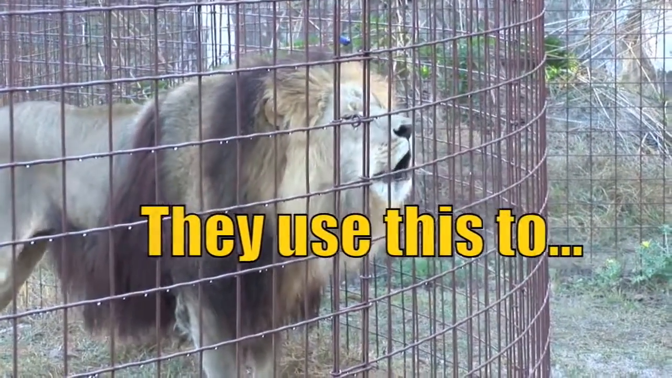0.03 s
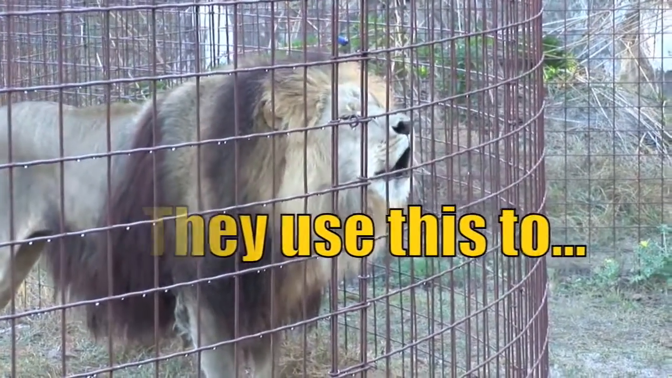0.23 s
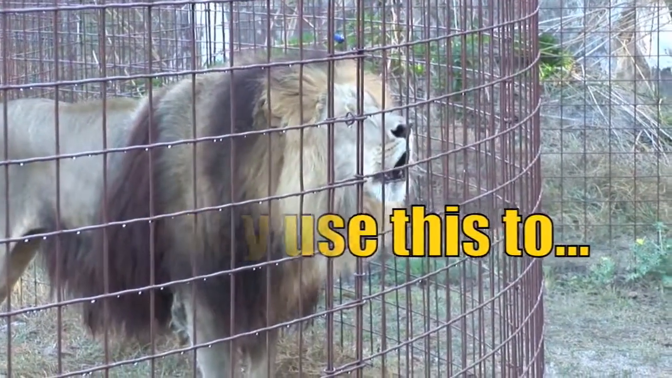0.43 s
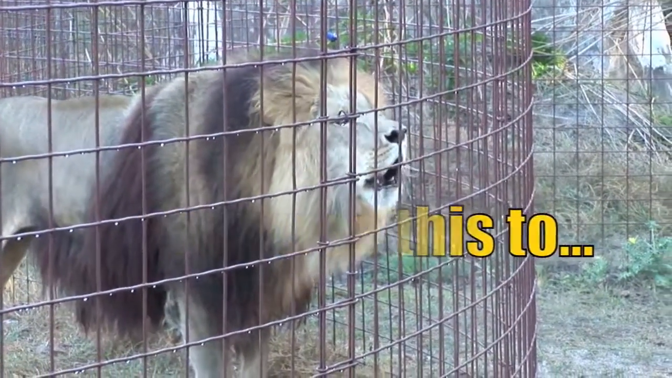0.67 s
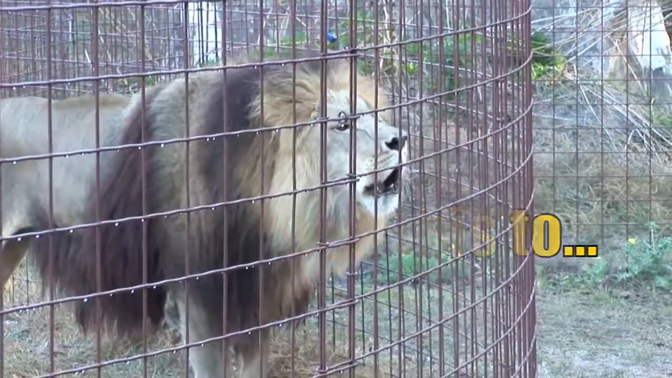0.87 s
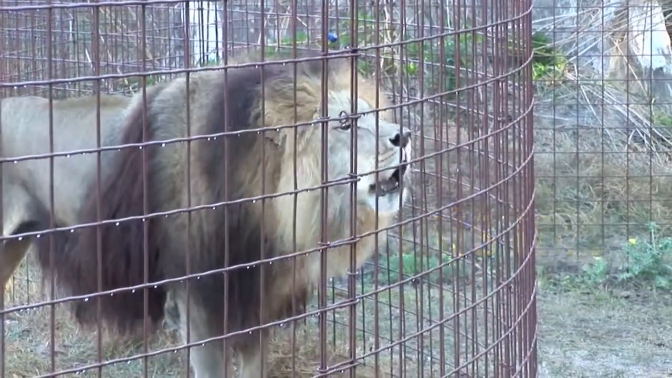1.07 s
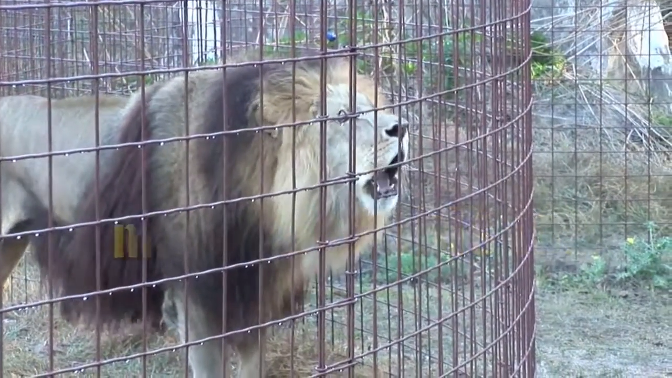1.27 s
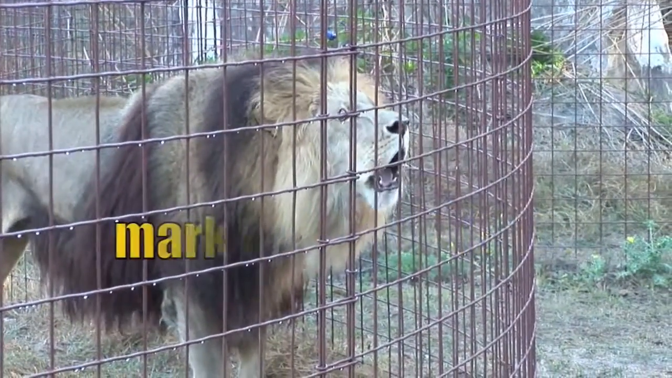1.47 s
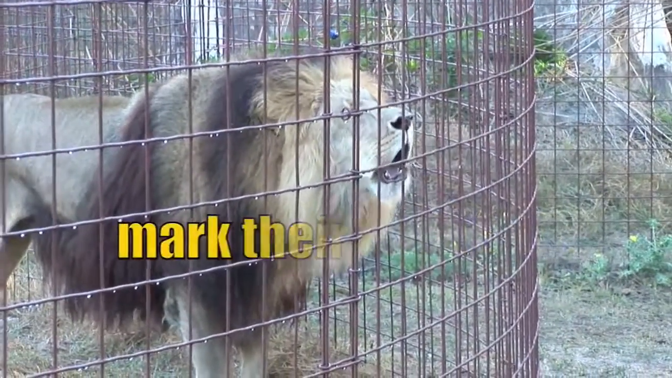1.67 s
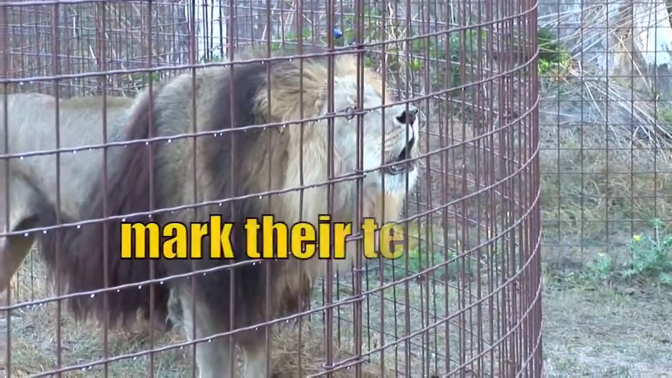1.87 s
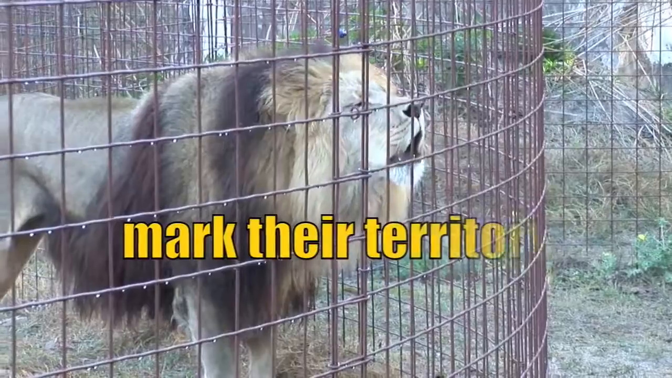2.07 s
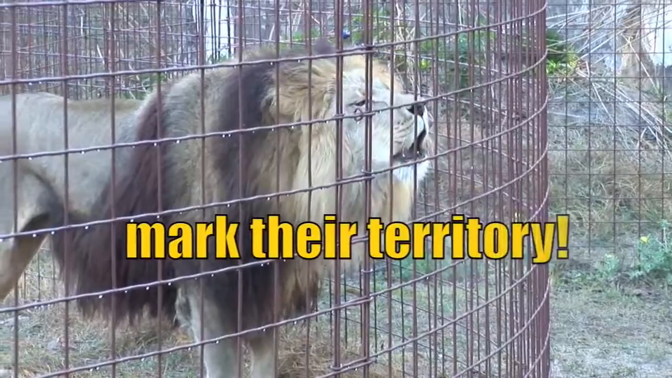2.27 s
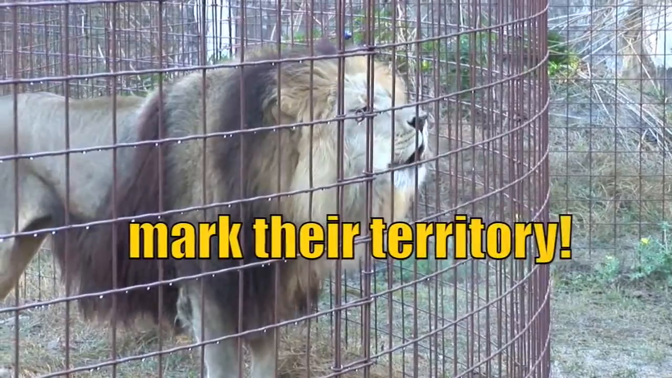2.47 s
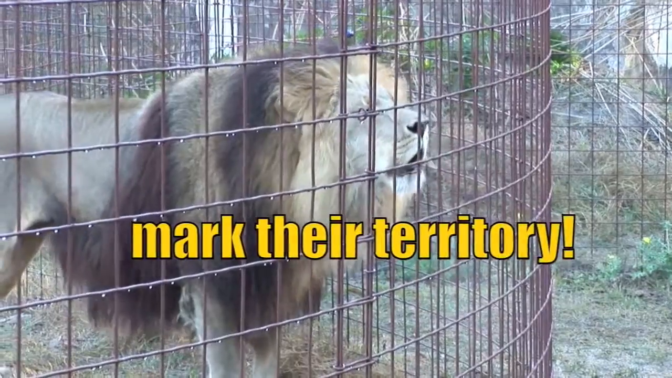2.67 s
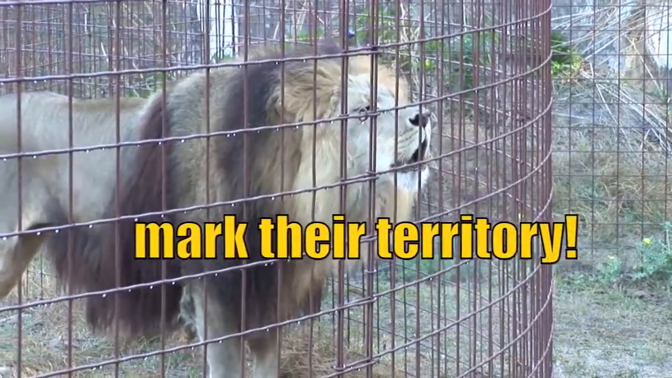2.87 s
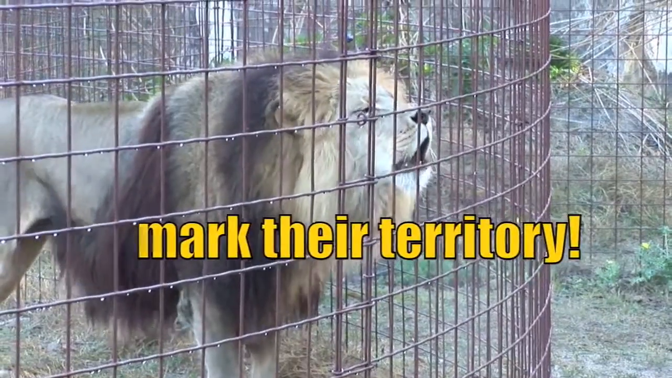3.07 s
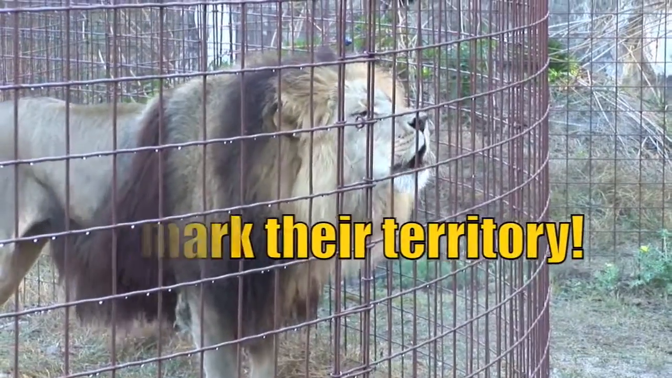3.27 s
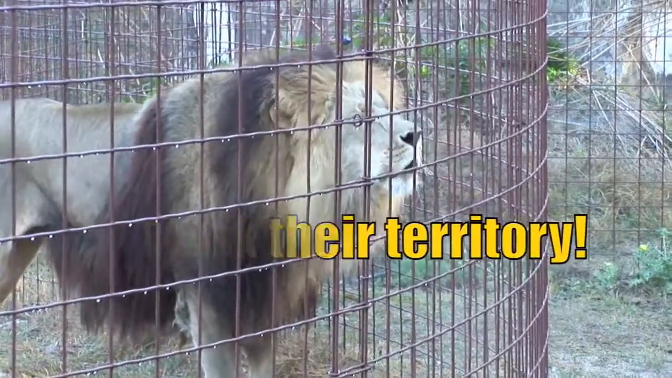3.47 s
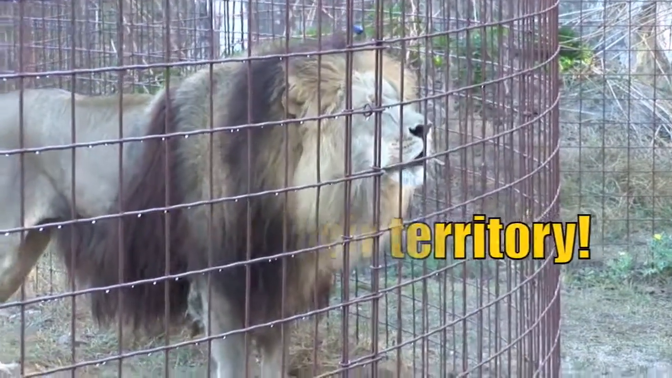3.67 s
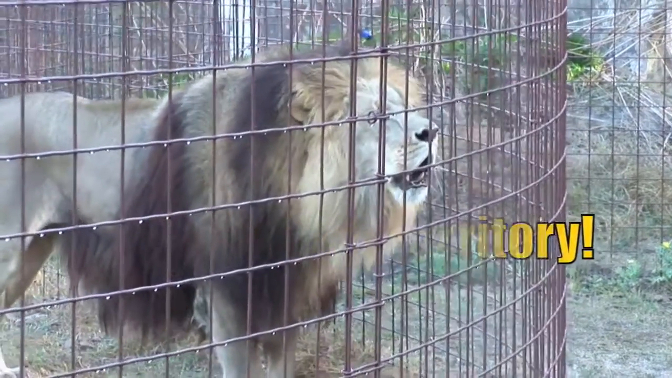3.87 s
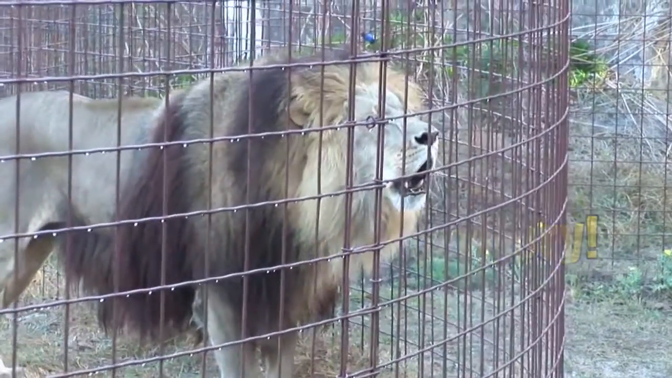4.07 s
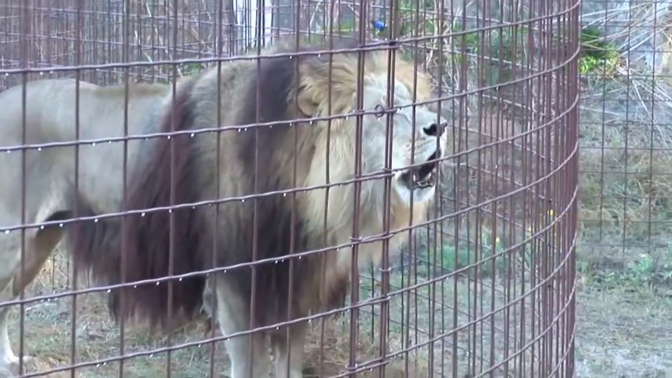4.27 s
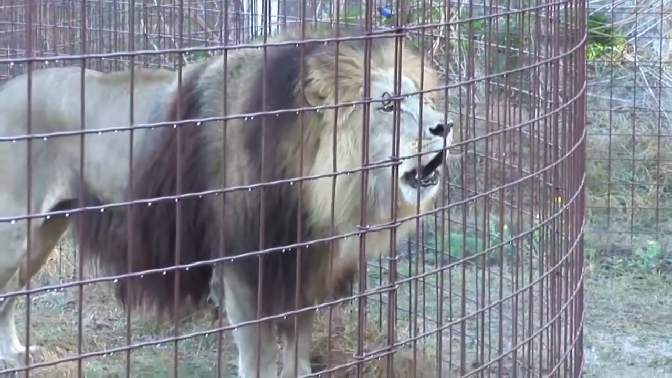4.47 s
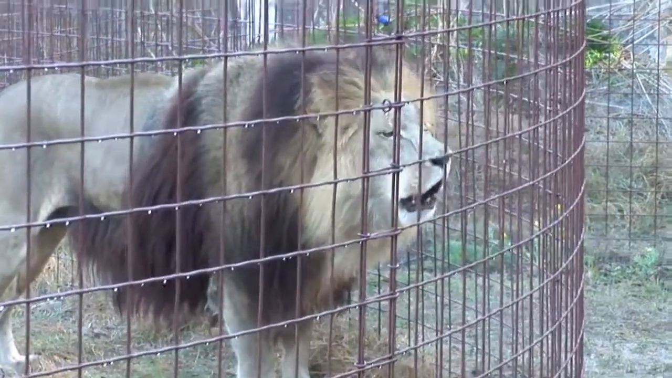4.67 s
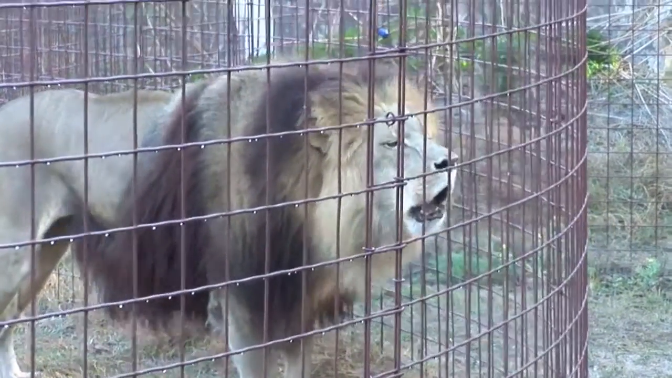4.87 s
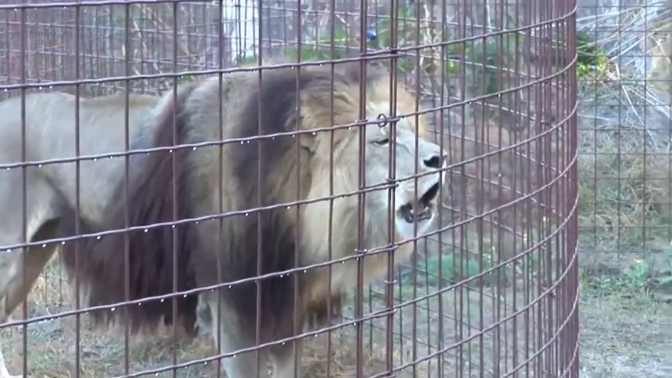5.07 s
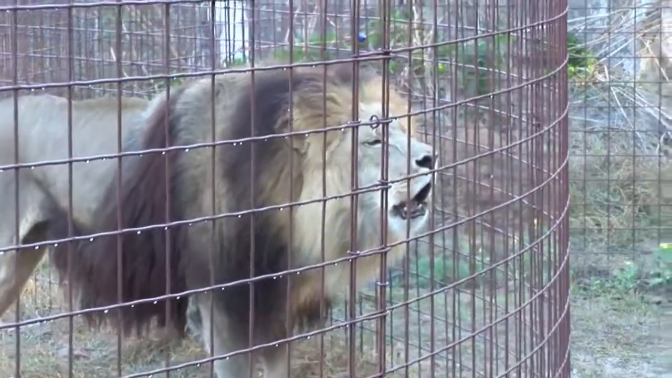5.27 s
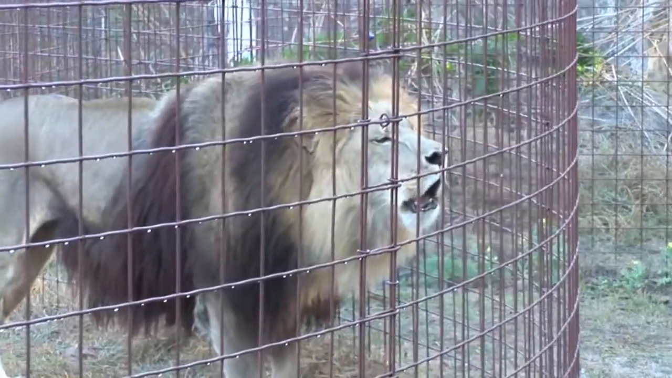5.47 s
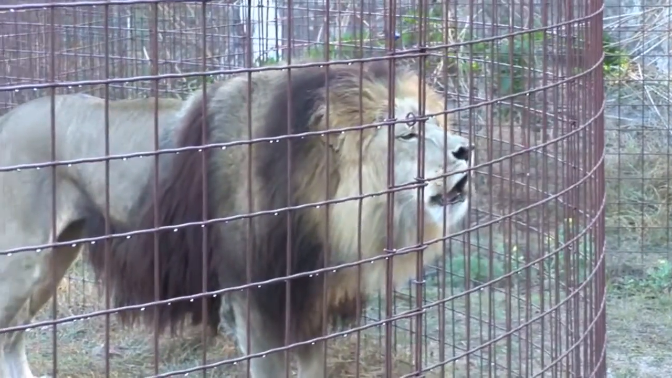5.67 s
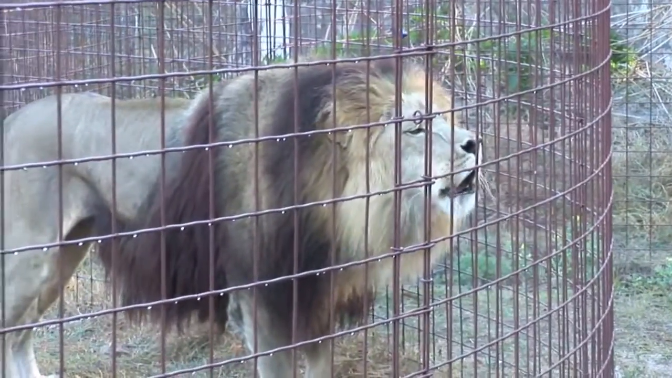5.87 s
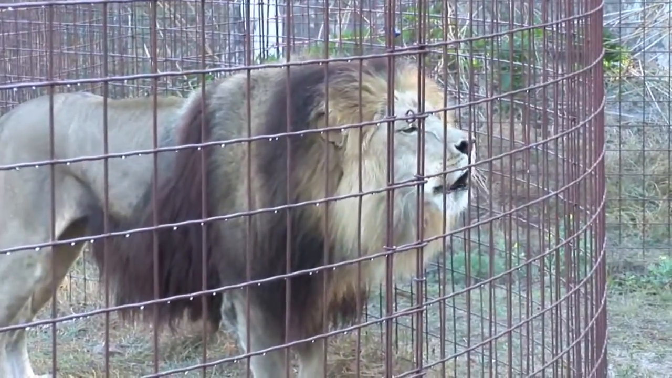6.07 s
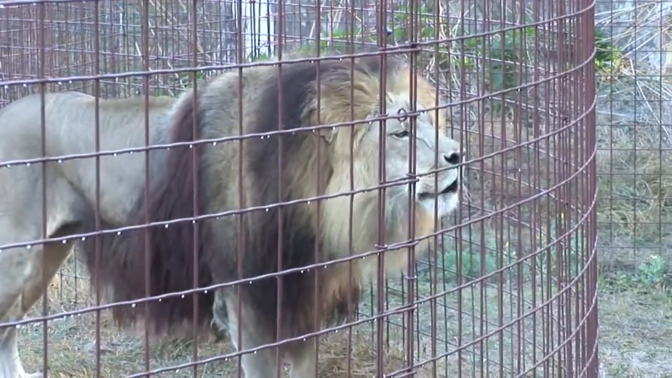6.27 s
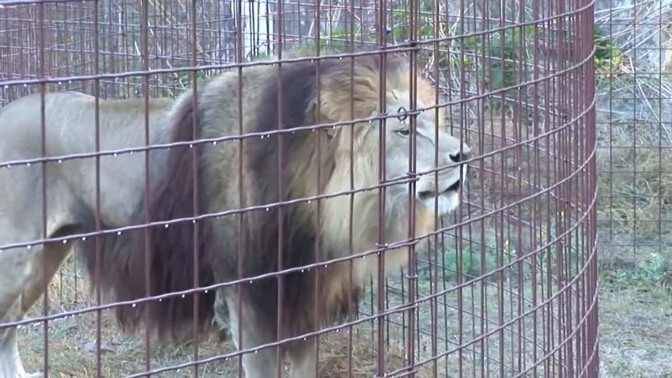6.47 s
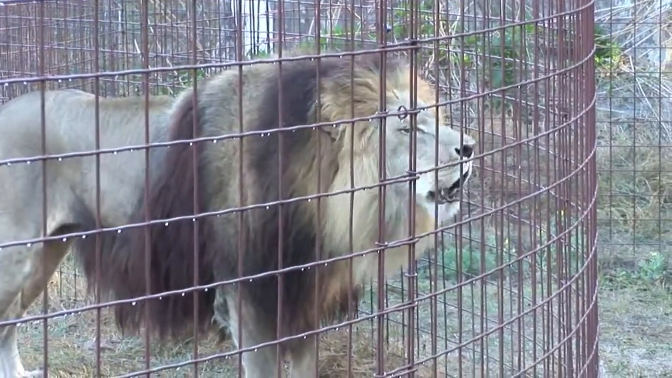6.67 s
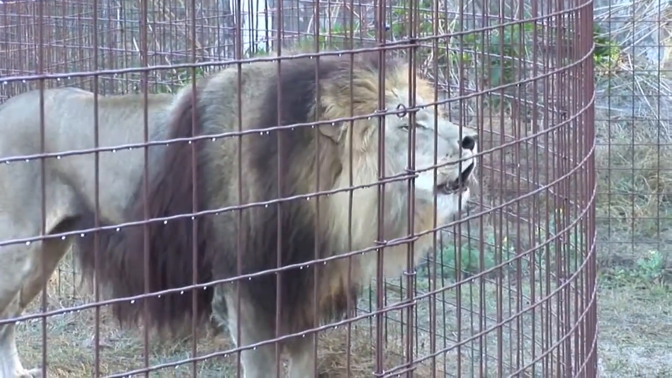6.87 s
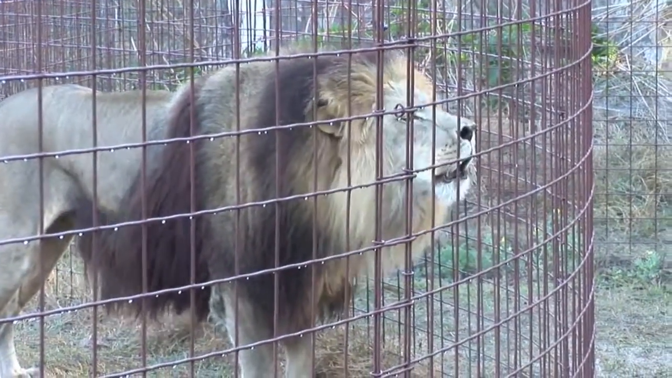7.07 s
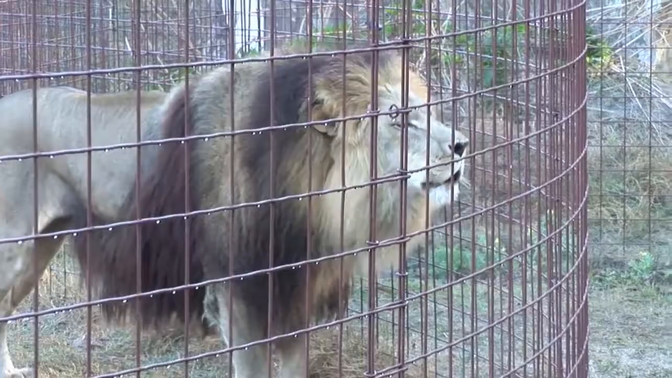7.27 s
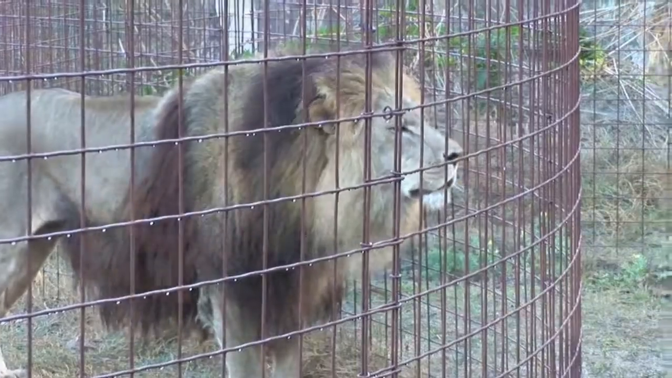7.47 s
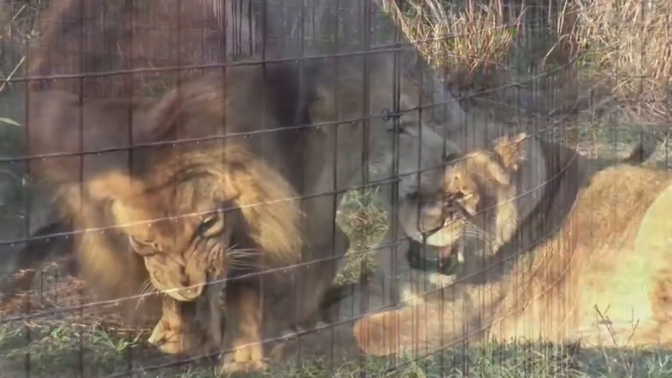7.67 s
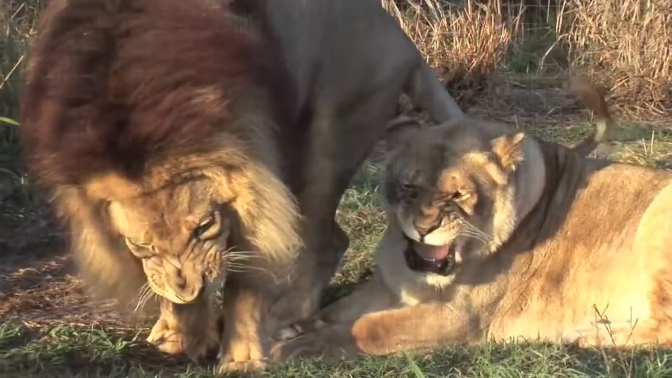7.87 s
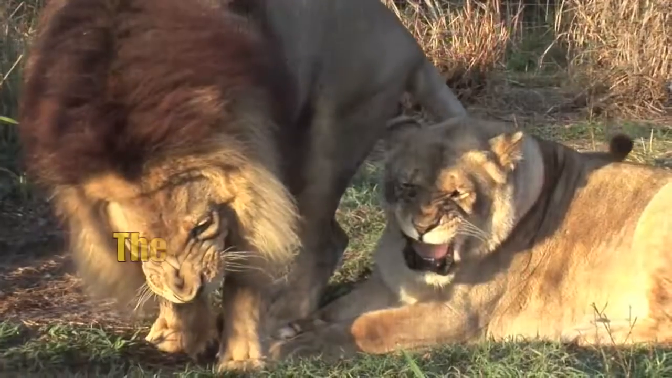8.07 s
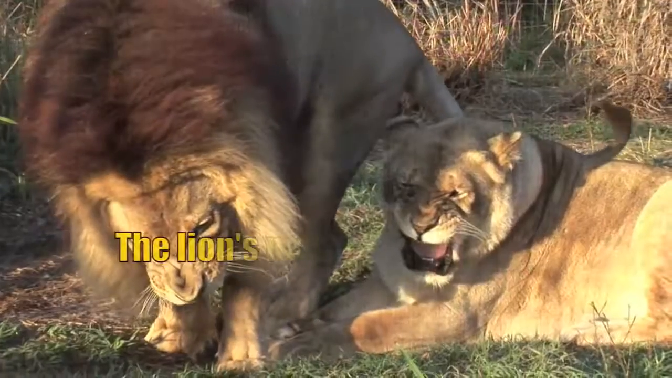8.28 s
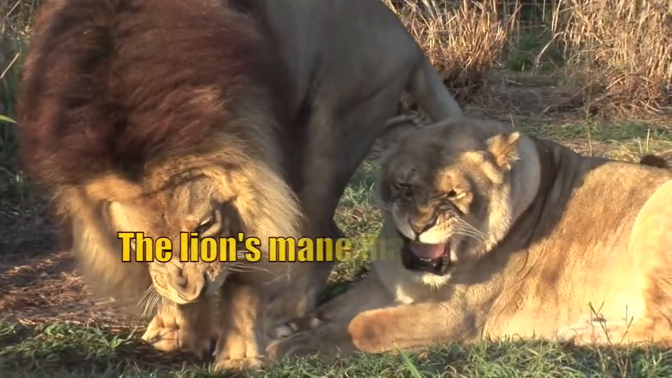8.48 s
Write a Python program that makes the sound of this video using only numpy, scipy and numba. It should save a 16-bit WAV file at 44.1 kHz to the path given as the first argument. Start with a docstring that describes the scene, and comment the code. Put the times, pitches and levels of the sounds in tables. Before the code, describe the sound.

Outdoors in an open enclosure, faint traffic hum and thin bird whistles lie under a close male lion. It draws a rattling breath, roars long and deep, rising then sagging into a rough flutter, and gives a short grunt. After a pause comes a second long roar, then another grunt. Near the end a second lion begins a rising moan further off. The microphone is fairly near, with only slight dull echo.

```python
"""Distant traffic hums under thin bird calls; close by, a male lion draws breath, roars twice and grunts twice.
Each call carries near-pure chest tones, a pulsed buzz and a breathy rasp rung through throat resonances.
As a call dies the folds go slack and slap shut; a second lion starts to moan further off near the end.
Birds are gliding sines; the open air, hisses and far growl are shaped noise, and enclosure echoes follow the lions."""
import sys
import numpy as np
from scipy import signal
from scipy.fft import rfft, irfft, next_fast_len
from scipy.io import wavfile
from scipy.ndimage import uniform_filter1d
from numba import njit

SR = 44100
rng = np.random.default_rng(int(sys.argv[2]) if len(sys.argv) > 2 else 0)


def dump_mix(stems):
    """Bounce the given channels to the path in sys.argv[1] as a 16-bit WAV at rate SR."""
    frames = np.atleast_2d(stems).T  # one column per channel
    limited = np.clip(frames, -1, 1)  # hard clip at full scale
    pcm = np.round(limited * 32767).astype(np.int16)
    wavfile.write(sys.argv[1], SR, pcm)


N = 375285


def amp(db):
    """Gain of a level in dB."""
    return 10 ** (np.asarray(db) / 20)


def rms_one(x):
    """Scales a signal to unit rms."""
    return x / np.sqrt(np.mean(x ** 2) + 1e-20)


def clock():
    """Time in seconds at every sample."""
    return np.arange(N) / SR


def in_time(*tables):
    """Table columns glided to every sample, then a gate that is open within each table's time span."""
    t = clock()
    s, *columns = np.transpose(np.vstack(tables))
    gate = 0
    for rows in tables:
        inside_s = np.minimum(t - rows[0][0], rows[-1][0] - t)
        gate = gate + np.clip(inside_s / .008, 0, 1)   # 8 ms fades
    return [np.interp(t, s, column) for column in columns] + [gate]


def colour(x, points):
    """Equalises x along a curve of (Hz, dB), joined on a log frequency axis."""
    size = next_fast_len(N)
    hz = np.maximum(np.fft.rfftfreq(size, 1 / SR), 1)
    point_hz, point_db = np.array(points).T
    gain = amp(np.interp(np.log(hz), np.log(point_hz), point_db))
    return irfft(rfft(x, size) * gain, size)[..., :N]


def cut(x, hz, kind, order=4):
    """Butterworth high- or low-pass."""
    return signal.sosfilt(signal.butter(order, hz, kind, fs=SR, output="sos"), x)


def leak(x, fade_s):
    """Each impulse becomes an exponential fade with this time constant."""
    return signal.lfilter([1], [1, -np.exp(-1 / (fade_s * SR))], x)


def drift(rate):
    """Smooth random modulation of unit rms; a higher rate in Hz wanders faster."""
    r = np.exp(-80 * np.pi * rate / SR)   # runs once per 40 samples
    noise = rng.standard_normal(N // 40 + 2002)
    slow = signal.lfilter([1], [1, -2 * r, r * r], noise)[2000:]   # drop the settling
    return np.interp(np.arange(N) / 40, np.arange(len(slow)), rms_one(slow))


def even(x, window_s):
    """Levels x so that its running rms stays near one."""
    return x / np.sqrt(uniform_filter1d(x ** 2, size=int(window_s * SR)) + 1e-12)


def sine(hz):
    """Unit-rms sine along a pitch curve."""
    return np.sqrt(2) * np.sin(2 * np.pi * np.cumsum(hz) / SR)


def clicks(events):
    """One single-sample click for each (s, dB) row."""
    out = np.full(N, 1e-18)
    out[[round(s * SR) for s, db in events]] = amp([db for s, db in events])
    return out


# spectrum of the open air: f/Hz, relative density/dB
AIR = [(15, -37.5), (25, -4.5), (107, 6), (222, -5.5), (248, -11), (587, -6.5), (1430, -9), (1920, -16.5),
       (2520, -19), (4210, -31), (5820, -32.5), (6660, -45), (13100, -43), (15800, -39)]
# stereo width of the open air: f/Hz, side over mid level/dB
AIR_SIDE = [(60, -18), (110, -34), (200, -17), (380, -3.5), (700, 2), (1290, -1.5), (2380, -11.5),
            (4400, 0), (8120, 9.5), (15000, -21)]
AIR_DB = -48.5   # rms of the mid signal before its slow drift


def air():
    """Traffic hum and wind in leaves: coloured noise, centred in the bass and wide above."""
    mid, side = colour(rng.standard_normal((2, N)), AIR)
    scale = amp(AIR_DB + 0.49 * drift(2.5)) / np.std(mid)
    return scale * (mid + np.outer([1, -1], colour(side, AIR_SIDE)))


# brief high hisses: t of peak/s, level/dB, fade/dB per s
HISS = [(.22, -62.5, 65.5), (7.87, -62.5, 143)]
HISS_RISE_DB_PER_S = 273


def hiss():
    """Short puffs of treble noise around 11-12 kHz that rise fast and fade."""
    t = clock()
    gain = 0
    for s, db, fade_db in HISS:
        fall_db = np.where(t < s, HISS_RISE_DB_PER_S * (s - t), fade_db * (t - s))
        gain = gain + amp(db - fall_db)
    noise = rng.standard_normal((2, N))
    return gain * rms_one(cut(cut(noise, 11000, "high"), 12000, "low"))


# single bird notes: t/s, length/s, start f/Hz, middle f/Hz, end f/Hz, level/dB, left over right/dB
BIRDS = [(.81, .14, 3620, 3870, 3700, -74, 1), (.94, 0.024, 3700, 4700, 5800, -76, -2),
         (.962, 0.039, 5730, 5800, 5550, -72, 0), (3.09, 0.16, 3720, 3530, 3430, -70, -5),
         (.072, 0.28, 3610, 3430, 3160, -66.5, -2), (.82, 0.12, 2630, 2580, 2530, -61, -2),
         (.915, 0.017, 2600, 2350, 1900, -57.5, -2), (1.05, 0.14, 3710, 3720, 3510, -67.5, -5),
         (3.666, 0.059, 1970, 2040, 1920, -60, -6), (3.736, 0.075, 2480, 2750, 2780, -63, -2),
         (4.05, 0.038, 1470, 1800, 1600, -57, -4), (4.473, .44, 3770, 3527, 3254, -68.5, -2),
         (4.574, 0.015, 5140, 4000, 2830, -59, 7), (4.617, 0.017, 2300, 2100, 1900, -55, 7),
         (4.727, 0.012, 2050, 2260, 2530, -55, 9), (4.752, 0.038, 3390, 2900, 2350, -56, -1),
         (6.32, 0.068, 2500, 2250, 2050, -61, -3), (6.35, .049, 2690, 2780, 2980, -54, -2),
         (6.583, 0.052, 3630, 3530, 3500, -61.5, -3), (6.75, 0.039, 3260, 2820, 2300, -57.5, -1),
         (6.808, 0.032, 2340, 2340, 2300, -60, 0), (6.965, 0.039, 994, 1004, 993, -53.5, -20),
         (7.912, 0.023, 2640, 2700, 2670, -52, 0), (8.143, .03, 2700, 2666, 2660, -57, 0),
         (8.194, 0.027, 2580, 2600, 2680, -53, -2)]
# notes of a falling phrase: t after phrase start/s, length/s, start f/Hz, middle f/Hz, end f/Hz, relative level/dB
HOOK = [(0, .027, 3570, 4300, 4120, -8.5), (.032, .043, 4380, 3680, 2620, -3.5),
        (.089, .027, 2380, 2110, 2000, -7.5)]
# notes of a two-note phrase: t after phrase start/s, length/s, start f/Hz, middle f/Hz, end f/Hz, relative level/dB
PAIR = [(0, 0.025, 3530, 3000, 2710, 0.31), (.049, 0.021, 3120, 3130, 3170, -1.5)]
# where each falling phrase is sung: t/s, level/dB, left over right/dB
HOOKS = [(4.843, -48, 9), (6.417, -49, 6.5)]
# where each two-note phrase is sung: t/s, level/dB, left over right/dB
PAIRS = [(7.712, -60, -1), (7.993, -52.5, -0.5), (8.281, -53, 0)]
# distant chirps at random: start pitch range, share of pitch lost, length, loudest level
CHIRP_COUNT, CHIRP_LOW_HZ, CHIRP_HIGH_HZ = 16, 3500, 6400
CHIRP_FALL, CHIRP_S, CHIRP_DB = .14, .025, -71


def bird_notes():
    """Lists single notes, the notes of both phrases and random distant chirps, in the columns of BIRDS."""
    notes = list(BIRDS)
    for phrase, times in ((HOOK, HOOKS), (PAIR, PAIRS)):
        for s, db, pan_db in times:
            for after_s, length_s, start_hz, middle_hz, end_hz, note_db in phrase:
                notes.append((s + after_s, length_s, start_hz, middle_hz, end_hz, db + note_db, pan_db))
    for when, pitch, quiet, side in rng.random((CHIRP_COUNT, 4)):
        s = when * (N / SR - .5)
        hz = CHIRP_LOW_HZ * (CHIRP_HIGH_HZ / CHIRP_LOW_HZ) ** pitch
        middle_hz, end_hz = hz * (1 - CHIRP_FALL / 2), hz * (1 - CHIRP_FALL)
        notes.append((s, CHIRP_S, hz, middle_hz, end_hz, CHIRP_DB - 8 * quiet, 12 * (side - .5)))
    return notes


def birds():
    """Thin gliding whistles from both sides, smeared by the trees with a short decaying noise."""
    out = np.zeros((2, N))
    for s, length_s, start_hz, middle_hz, end_hz, db, pan_db in bird_notes():
        u = np.linspace(0, 1, round(length_s * SR))
        hz = np.polyval(np.polyfit([0, .5, 1], [start_hz, middle_hz, end_hz], 2), u)
        note = np.sqrt(np.sin(np.pi * u).clip(0)) * sine(hz)
        left_right = amp([db + pan_db / 2, db - pan_db / 2])
        out[:, round(s * SR):][:, :len(u)] += np.outer(left_right, note)
    t = np.arange(SR // 4) / SR
    trees = rng.standard_normal((2, len(t))) * np.exp(-t / 0.067)
    smear = signal.fftconvolve(out, trees / np.linalg.norm(trees[0]), axes=1)[:, :N]
    return out * amp(2.0 * drift(40)) + amp(-0.5) * smear


# moan of the far lion: t/s, pitch f/Hz, tone level/dB
FAR = [(7.52, 191, -58), (7.66, 207.2, -42), (7.76, 230.2, -38.5), (7.87, 242.3, -25.5),
       (8.08, 259.4, -28.5), (8.25, 305.7, -33), (8.51, 323.6, -36.5)]
# low growl spectrum: f/Hz, relative density/dB
FAR_GROWL = [(40, -34.5), (70, 6.5), (120, -10.5), (220, 7.5), (400, -1.5), (570, -2), (640, -27),
             (900, -60)]
# upper rasp spectrum: f/Hz, relative density/dB
FAR_RASP = [(470, -30), (800, 1.5), (924, -14), (1100, -3), (2150, -3), (2380, 2.5), (2620, -12),
            (3230, -14.5), (4010, -25.5), (4500, -29), (5850, -53), (9900, -120)]
# swell shared by growl and two-thirds line, before their own trims: start level, climb, ceiling
FAR_SWELL_DB, FAR_SWELL_DB_PER_S, FAR_SWELL_TOP_DB = -58, 31.5, -35.5
# the rasp climbs steeply to this time and level, then slowly
FAR_RASP_S, FAR_RASP_DB = 7.855, -50.5
FAR_RASP_ATTACK_DB_PER_S, FAR_RASP_DB_PER_S = 251, 8.5


def far_lion():
    """A rising moan over flickering growl and rasp noise, with lines from uneven fold cycles below the pitch."""
    hz, tone_db, on = in_time(FAR)
    t = clock()
    start_s, end_s = FAR[0][0], FAR[-1][0]
    swell_db = np.minimum(FAR_SWELL_DB + FAR_SWELL_DB_PER_S * (t - start_s), FAR_SWELL_TOP_DB)
    rasp_slope = np.where(t < FAR_RASP_S, FAR_RASP_ATTACK_DB_PER_S, FAR_RASP_DB_PER_S)
    rasp_db = FAR_RASP_DB + rasp_slope * (t - FAR_RASP_S)
    # the moan cracks as it climbs: pitch and level waver more
    strain = np.clip((t - start_s) / (end_s - start_s), 0, 1) ** 2
    tone_gain = amp(tone_db + (2.0 + 2.2 * strain) * drift(21.3))
    tone = tone_gain * sine(hz * (1 + (0.0067 + 0.051 * strain) * drift(18.0)))
    growl_noise = rms_one(colour(rng.standard_normal(N), FAR_GROWL))
    growl = amp(swell_db + 7 + 1.2 * drift(54)) * growl_noise
    rasp = amp(rasp_db) * rms_one(colour(rng.standard_normal(N), FAR_RASP))
    # uneven fold cycles add lines at one half and two thirds of the pitch
    half = amp(tone_db - 18 + 5.2 * drift(23)) * sine(hz / 2)
    two_thirds = amp(swell_db - 2 + 3.0 * drift(12)) * sine(hz * 2 / 3)
    return on * (tone + half + two_thirds + growl + rasp)


# soft knocks while breathing in: t/s, relative peak level/dB
RATTLE = [(0.321, -34), (0.343, -25.5), (0.378, -31), (0.394, -19.5), (0.436, -23.5), (0.473, -21.5),
          (0.526, -19.5), (0.576, -38), (3.068, -25.5), (3.106, -24), (6.933, -24.5)]
RATTLE_HZ, RATTLE_T60_S = 157.6, 0.073   # chest cavity ring


def rattle():
    """Soft knocks ring the chest cavity, a single decaying resonance."""
    r = amp(-60 / (RATTLE_T60_S * SR))
    w = 2 * np.pi * RATTLE_HZ / SR
    ring = signal.lfilter([0, np.sin(w)], [1, -2 * r * np.cos(w), r * r], clicks(RATTLE))
    return amp(-4.5) * cut(ring, 310, "low", order=2)


# breathing in: t/s, length/s, level before the blend of layers/dB
IN_BREATHS = [(0.223, 0.41, -51), (3, 0.17, -52)]


def in_breath():
    """Gain of the air drawn in: each breath is a rounded swell."""
    t = clock()
    gain = 0
    for s, length_s, db in IN_BREATHS:
        gain = gain + amp(db) * np.sin(np.pi * np.clip((t - s) / length_s, 0, 1))
    return gain


# high chest tone, one list per call that has it: t/s, pitch f/Hz, level/dB, octave level/dB
HIGH_TONE = [
    [(1.14, 189, -50.5, -78), (1.24, 202.6, -21, -40), (1.32, 222.7, -14, -26.5),
     (1.41, 248.2, -18.5, -31.5), (1.63, 245.9, -14, -50.5), (1.68, 253.5, -23.5, -23),
     (1.77, 264.8, -39, -32), (1.9, 257.7, -27, -46)],
    [(4.88, 204, -55, -74), (4.96, 204.3, -29.5, -40), (5.07, 207.6, -10.5, -32),
     (5.2, 224.7, -17.5, -27.5), (5.33, 225.4, -13.5, -25), (5.39, 217.2, -12, -42.5), (5.5, 211, -14, -39),
     (5.6, 196, -13, -31.5)],
    [(7.05, 153.4, -40, -70), (7.1, 184.5, -19, -40), (7.16, 183.2, -20.5, -38), (7.23, 233, -32, -52)],
]
# each call, before catches and wavering: t/s, low chest pitch f/Hz, low tone level/dB, buzz level/dB,
# mouth rasp level/dB
VOICE = [
    [(1.14, 135, -59, -61.5, -67.5), (1.25, 145, -28, -32.5, -44.5), (1.35, 159.1, -30, -25.5, -33.5),
     (1.48, 166.9, -34, -21, -40.5), (1.74, 181, -30.5, -25, -34.5), (1.8, 176.3, -21, -22, -33),
     (1.97, 171.3, -8.5, -22, -31.5), (2.1, 149.6, -10, -27.5, -34), (2.145, 146.7, -17, -30, -32.5),
     (2.2, 142.1, -22.5, -32.5, -27), (2.31, 137.5, -15.5, -28.5, -35.5), (2.47, 107.4, -27, -35.5, -32.5),
     (2.54, 105.5, -38, -38.5, -38), (2.62, 111.5, -58, -61, -63.5)],
    [(3.19, 148, -51, -64, -75), (3.235, 148, -20, -30, -43), (3.3, 151.6, -7, -24, -35),
     (3.345, 144, -7.5, -22, -33), (3.385, 134, -18, -34, -33.5), (3.43, 135, -26.5, -34.5, -35),
     (3.47, 137.9, -49, -42, -42), (3.58, 136, -68, -66, -67)],
    [(4.88, 136.4, -55.5, -61.5, -68), (4.97, 145.6, -36.5, -38, -49.5), (5.03, 146.7, -23.5, -30, -41),
     (5.1, 142.7, -33, -25, -31), (5.2, 150.7, -30.5, -24, -33.5), (5.4, 156.5, -30.5, -27, -34),
     (5.56, 172.1, -22.5, -29.5, -37.5), (5.6, 167.8, -10, -25, -33), (5.84, 146.5, -11, -29, -36.5),
     (5.9, 142.2, -12.5, -28, -33.5), (5.97, 133.8, -19, -33, -32), (6.11, 133.6, -17, -30.5, -34.5),
     (6.23, 128.7, -30, -40, -40), (6.33, 119.7, -69, -68, -58)],
    [(7.02, 141.4, -46.5, -68, -70), (7.09, 142, -17.5, -30, -39), (7.17, 134, -9.5, -23.5, -31.5),
     (7.22, 137.7, -13.5, -32, -34.5), (7.3, 120.8, -28, -37.5, -35.5), (7.4, 139.6, -52, -59, -64)],
]
# folds in each call: t when the fold cycle stops following the high tone and follows the low one
# (call start in the grunts)/s, t going slack/s, roughness while tense/0-1
PHASES = [(1.9, 2.12, .08), (3.19, 3.365, .1), (5.59, 5.87, .2), (7.02, 7.2, .3)]
CYCLES_PER_TONE = 3   # a chest tone is the third harmonic of the fold cycle
# extra roughness and its time spread at the call's onset and just before the cycle follows the low tone
ONSET_ROUGH, ONSET_S, TO_LOW_ROUGH, TO_LOW_S = .2, .14, .2, .2
SLACK_ROUGH, SLACKEN_S = .85, .03   # roughness of slack folds, time to slacken


def folds():
    """Fold cycles per second and roughness: extra rough at the onset and around to_low_s, slack at the end."""
    t = clock()
    per_s = in_time(*VOICE)[0] / CYCLES_PER_TONE
    rough = np.full(N, SLACK_ROUGH)
    high_hz = in_time(*HIGH_TONE)[0]
    for rows, (to_low_s, slack_s, tense) in zip(VOICE, PHASES):
        start_s = rows[0][0]
        follows_high = (t > start_s) & (t < to_low_s)   # never true in the grunts
        per_s = np.where(follows_high, high_hz / CYCLES_PER_TONE, per_s)
        onset = ONSET_ROUGH * np.exp(-((t - start_s) / ONSET_S) ** 2)
        to_low = TO_LOW_ROUGH * np.exp(-((t - to_low_s + SLACKEN_S) / TO_LOW_S) ** 2)
        tight = (t > start_s) * np.clip((slack_s - t) / SLACKEN_S + .5, 0, 1)
        rough = rough + tight * (tense + onset + to_low - SLACK_ROUGH)
    return per_s, np.clip(rough, 0, 1)


# the voice catches briefly: t/s, half length/s, loss of low tone/dB, loss of mouth rasp/dB
CATCHES = [(1.615, .03, 0, 9), (1.712, .03, 0, 11), (5.29, .04, 0, 7), (5.4, .04, 0, 9), (2.27, .012, 3, 8),
           (6.015, .015, 3, 8), (6.07, .02, 4, 8), (2.122, .013, 16, 11), (2.188, .022, 9, 14),
           (2.355, .022, 11, 6), (3.368, .016, 14, 5), (5.622, .018, 7, 0), (5.866, .024, 24, 9),
           (5.945, .018, 9, 4), (7.122, .022, 11, 0), (7.205, .015, 7, 5)]


def catches():
    """Loss in dB of the low tone and of the rasp: a rounded dip wherever the voice catches."""
    t = clock()
    loss_db = 0
    for s, half_s, tone_db, rasp_db in CATCHES:
        dip = np.clip(1 - ((t - s) / half_s) ** 2, 0, 1)
        loss_db = loss_db + np.outer([tone_db, rasp_db], dip)
    return loss_db


@njit
def resonate(x, turn, r):
    """A resonance with a moving centre, applied twice so that the valleys stay dark."""
    for stage in range(2):
        y, gain = np.zeros_like(x), (1 - r * r) / 2
        for i in range(2, len(x)):
            y[i] = gain * (x[i] - x[i - 2]) + turn[i] * y[i - 1] - r * r * y[i - 2]
        x = y
    return x


# throat and mouth resonances: f/Hz at mouth rest, width of one pass/Hz, relative level/dB,
# share of the mouth's shift/0-1
THROAT = [(447.3, 177, 1, 0), (522, 195, -0.5, 0), (628, 228, -5, 0.98), (848.3, 62, -2, 0.6),
          (928, 150, -7.5, 0.02), (1234, 220, -13.5, 0.5), (1449, 160, 0, 0.3), (1910, 560, -17, 0.4),
          (2375, 183, -7, 0.83), (2559, 256, -6.5, 0.66), (3166, 380, -14, .4), (3842, 690, -21.5, 0),
          (5014, 244, -23.5, 0), (5740, 690, -33.5, 0.1), (8300, 550, -63, 0.4), (10360, 4700, -41, 0.09),
          (11200, 1000, -57, 0.05), (12510, 4700, -43, 0), (14500, 2500, -73, 0)]
# the mouth opens and closes, one list per call: t/s, centre of the front-cavity resonance f/Hz
MOUTH = [
    [(1.18, 2176), (1.292, 2490), (1.566, 2580), (1.978, 2253), (2.014, 2421), (2.33, 2190), (2.58, 2325)],
    [(3.2, 2334), (3.476, 2230), (3.54, 2370)],
    [(4.95, 2386), (5.182, 2630), (5.394, 2431), (5.65, 2520), (5.75, 2360), (6.204, 2337), (6.28, 2490)],
    [(7.05, 2340), (7.156, 2360), (7.36, 2234)],
]
MOUTH_REST_HZ = 2480   # the mouth's shift is its centre over this


def throat(x, modes, patchy_db):
    """Parallel resonances with alternating signs; they move with the mouth and each flickers on its own."""
    out = 0
    shift = in_time(*MOUTH)[0] / MOUTH_REST_HZ
    for k, (hz, width, db, share) in enumerate(modes):
        r = np.exp(-np.pi * width / SR)
        centre_hz = hz * (1 + share * (shift - 1))
        turn = 2 * r * np.cos(2 * np.pi * centre_hz / SR)
        gain = amp(db + patchy_db * drift(13.1))
        out = out + (-1) ** k * gain * resonate(x + 1e-18, turn, r)
    return out


# loose folds slap shut as a call dies, the louder slaps: t/s, relative peak level/dB
FLAPS = [(2.143, -15.5), (2.159, -20.5), (2.2118, -21), (2.2433, -19), (2.2797, -23), (2.2964, -12),
         (2.3143, -11), (2.3598, -20), (2.388, -14), (2.4094, -22), (2.4435, -17.5), (2.4611, -19.5),
         (2.502, -28.5), (2.5227, -19.5), (2.5522, -25.5), (3.3827, -18.5), (3.4051, -25.5), (3.4276, -17),
         (3.4777, -25.5), (3.5084, -23.5), (5.5982, -14), (5.81, -27), (5.8252, -14.5), (5.8983, -15),
         (5.9144, -24.5), (5.9564, -23), (6.0269, -18.5), (6.048, -20), (6.0854, -23), (6.1164, -22),
         (6.1556, -21), (6.1763, -24), (6.1944, -19), (6.2463, -27.5), (7.1602, -27.5), (7.2264, -23)]
SOFT_FLAPS_PER_S, SOFT_FLAP_DB = 10, 6   # average rate; mean level over the mouth rasp, before the throat


def flaps():
    """Clicks of the loud slaps, and random soft ones wherever the folds are slack."""
    rasp_db, on = in_time(*VOICE)[3:]
    slack = folds()[1] >= SLACK_ROUGH
    soft = rng.random(N) < SOFT_FLAPS_PER_S / SR * on * slack
    return clicks(FLAPS) + soft * amp(rasp_db + SOFT_FLAP_DB + 2.7 * rng.standard_normal(N))


def slaps(shut):
    """Fold slaps and the in-breath rattle knock the throat; each slap also lets out a burst of air noise."""
    burst = leak(shut, 0.0032) * rng.standard_normal(N)
    knocks = amp(9.5) * burst + amp(20.5) * shut + amp(16.5) * clicks(RATTLE)
    return throat(knocks, THROAT[:14], patchy_db=3.5)


BUZZ_CATCH = 0.51   # share of the tone's loss in dB taken by the buzz
# throat rasp lies between mouth rasp (0) and buzz (1), plus a trim and a change with roughness
THROAT_FROM_BUZZ, THROAT_DB, THROAT_SLACK_DB = 0.71, -4, -13
FLUTTER_DB, FLUTTER_SLACK_DB = -20, 30.5   # over the uncaught mouth rasp; gain with roughness squared


def breath(shut):
    """Fold overtones sing in the low resonances; pulses and air noise freed by cycles and slaps rasp above."""
    per_s, rough = folds()
    buzz_db, mouth_db, on = in_time(*VOICE)[2:]
    flutter_db = mouth_db + FLUTTER_DB + FLUTTER_SLACK_DB * rough ** 2
    tone_loss_db, rasp_loss_db = catches()
    buzz_db = buzz_db - BUZZ_CATCH * tone_loss_db
    mouth_db = mouth_db - rasp_loss_db
    throat_db = mouth_db + THROAT_FROM_BUZZ * (buzz_db - mouth_db) + THROAT_DB + THROAT_SLACK_DB * rough

    # one pulse per fold cycle, uneven in time and strength when rough
    cycle_hz = per_s * (1 + 0.11 * rough ** 2 * drift(30))
    new_cycle = np.diff(np.floor(np.cumsum(cycle_hz) / SR), prepend=0) > 0
    pulses = new_cycle * amp(3.8 * rough * drift(64))
    # cycles and slaps release puffs of air over a steady leak
    puffs = leak(pulses * (1 - rough), 0.06) + 0.13
    puffs += leak(amp(23) * shut, 0.011)
    air_noise = rms_one(puffs * rng.standard_normal(N))
    # each overtone swells and breaks off on its own
    overtones = 0
    for k in range(4, 17):
        overtones = overtones + amp(3.5 * drift(6)) * sine(k * cycle_hz * (1 + .003 * drift(25)))

    buzz_source = (1 - rough) * rms_one(overtones) + 5.5 * rough * air_noise
    buzz = throat(buzz_source, THROAT[:6], patchy_db=2.5)
    buzz = even(cut(cut(buzz, 310, "high"), 1280, "low"), 0.047)
    rasp_source = air_noise + 1.1 * (1 - rough) * rms_one(pulses)
    rasp = throat(rasp_source, THROAT[4:], patchy_db=4.0)
    throat_rasp = even(cut(cut(rasp, 954, "high"), 1505, "low"), 0.11)
    mouth_rasp = even(cut(rasp, 2114, "high"), 0.13)
    flutter = even(cut(cut(pulses + .002 * air_noise, 44, "high"), 180, "low"), 0.24)

    call = amp(buzz_db) * buzz + amp(throat_db) * throat_rasp
    call = call + amp(mouth_db) * mouth_rasp + amp(flutter_db) * flutter
    inhale = buzz + amp(-17) * throat_rasp + amp(-4) * mouth_rasp + amp(2) * flutter
    return on * call + in_breath() * inhale


def chest_tones():
    """Two near-pure tones, the high one with its octave; the low one wavers more as the folds slacken."""
    high_hz, high_db, octave_db, high_on = in_time(*HIGH_TONE)
    low_hz, low_db, _, _, low_on = in_time(*VOICE)
    low_db = low_db - catches()[0]
    rough = folds()[1]
    high_hz = high_hz * (1 + 0.0073 * drift(12.6))
    high = amp(high_db + 1.7 * drift(18)) * sine(high_hz)
    octave = amp(octave_db + 1.4 * drift(9.2)) * sine(2 * high_hz)
    low_gain = amp(low_db + 3.8 * rough ** 2 * drift(35))
    low = low_gain * sine(low_hz * (1 + 0.062 * rough ** 2 * drift(43)))
    # slack folds add a hoarse noise band around 150-170 Hz
    hoarse_noise = rms_one(cut(cut(rng.standard_normal(N), 150, "high"), 170, "low"))
    hoarse = amp(low_db - 9.0) * rough * hoarse_noise
    return high_on * (high + octave) + low_on * (low + hoarse)


# stereo width of the early reflections: f/Hz, side gain/dB
LION_SIDE = [(60, -80), (110, -60.5), (200, -67), (380, -18), (700, -17.5), (1290, -9), (2380, -35),
             (4400, -10), (8120, 2), (15000, -29)]


def enclosure(x, t60_s, echo_db, early_s):
    """Dull echoes from sheds and fences, and early ground reflections that differ between two microphones."""
    t = np.arange(int(.8 * SR)) / SR
    dull = cut(rng.standard_normal(len(t)), 210, "low", order=2)
    tail = dull * amp(-60 * t / t60_s) * (t > .03)   # echoes start after 30 ms
    early = rng.standard_normal(len(t)) * np.exp(-t / early_s)
    echoes = amp(echo_db) * signal.fftconvolve(x, tail / np.linalg.norm(tail))[:N]
    side = colour(signal.fftconvolve(x, early / np.linalg.norm(early))[:N], LION_SIDE)
    return x + echoes + np.outer([1, -1], side)


def scene():
    """Both lions in the enclosure, with birds, hisses and open air around."""
    shut = flaps()
    lions = far_lion() + rattle() + slaps(shut) + breath(shut) + chest_tones()
    return air() + hiss() + birds() + enclosure(lions, t60_s=.8, echo_db=-33.5, early_s=.007)


def record(dry):
    """The microphone loses the deepest bass; the top is cut steeply at 15.85 kHz."""
    steep = signal.ellip(10, .5, 70, 15850, fs=SR, output="sos")
    return signal.sosfilt(steep, cut(dry, 45, "high", order=2))


dry = scene()
out = record(dry)
dump_mix(out)
```